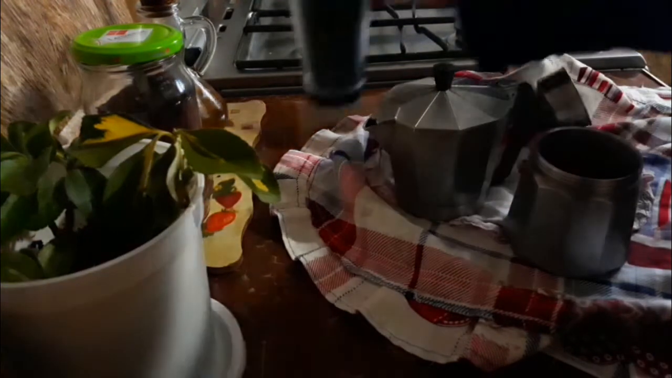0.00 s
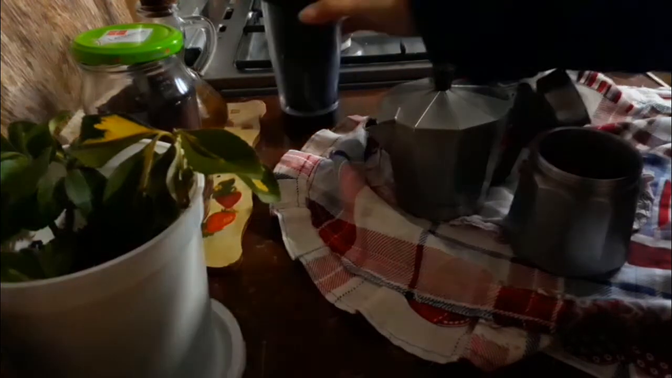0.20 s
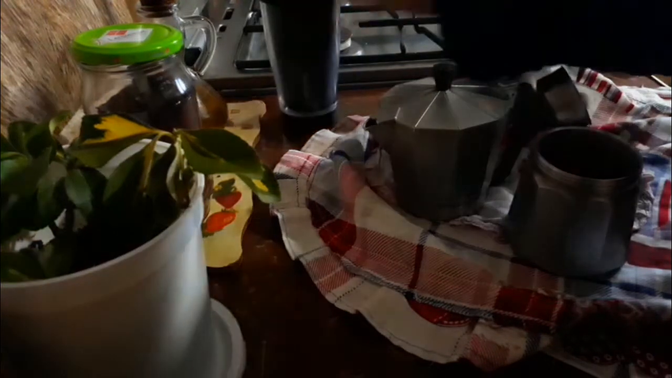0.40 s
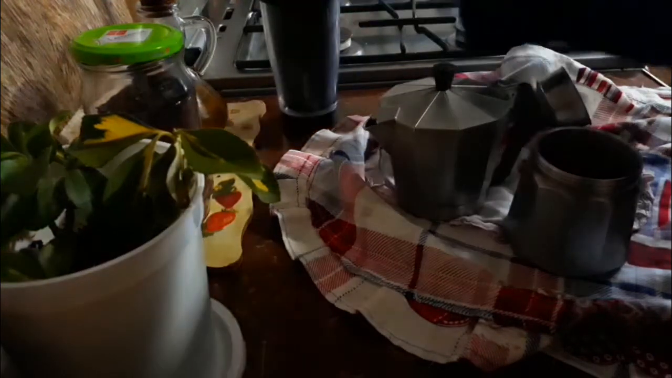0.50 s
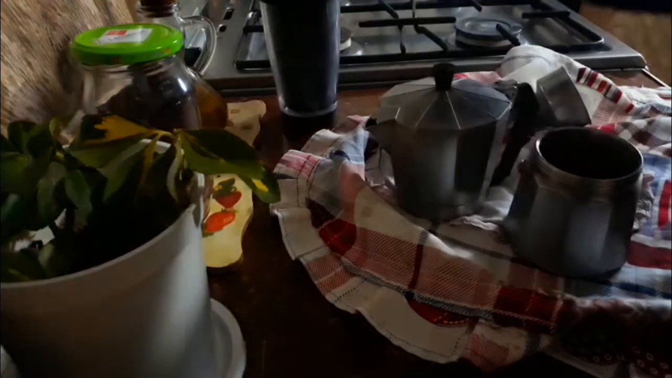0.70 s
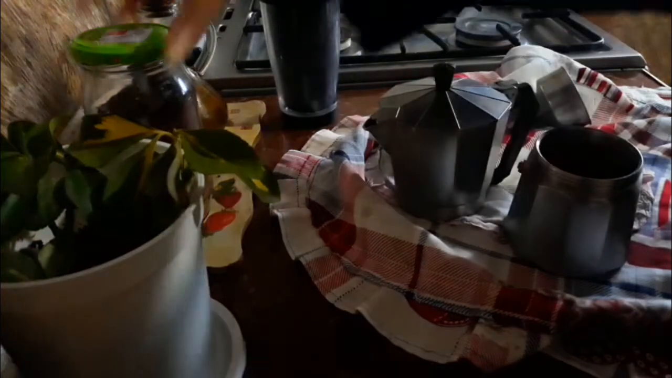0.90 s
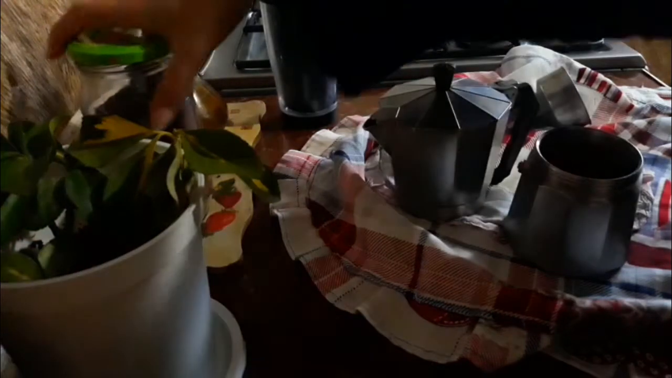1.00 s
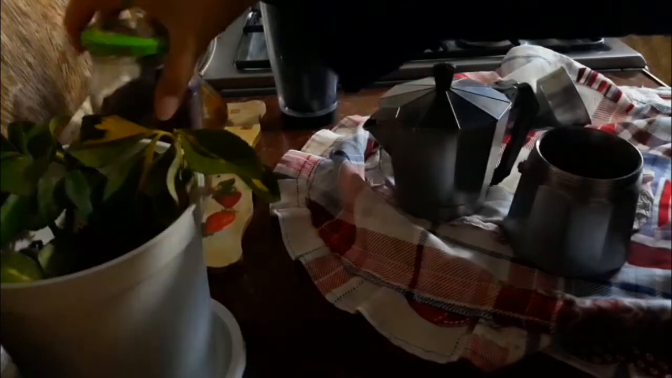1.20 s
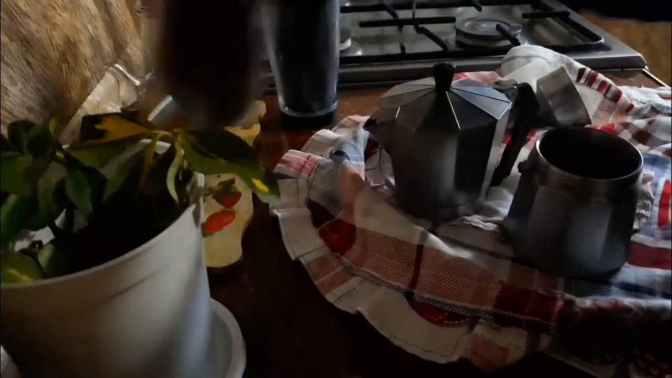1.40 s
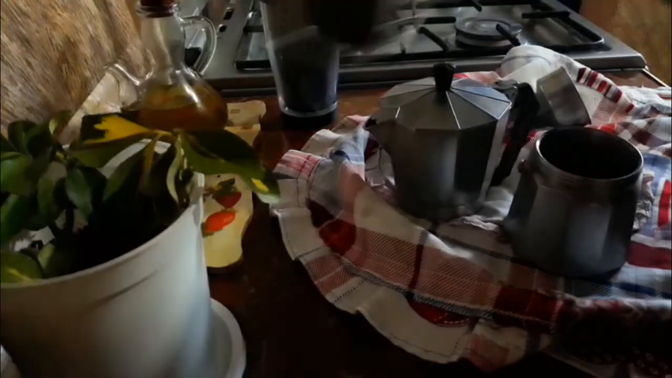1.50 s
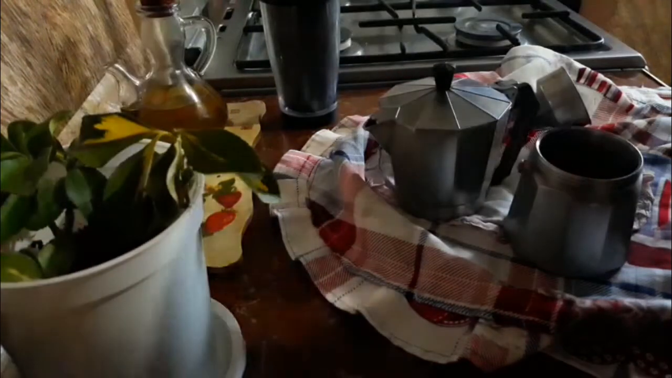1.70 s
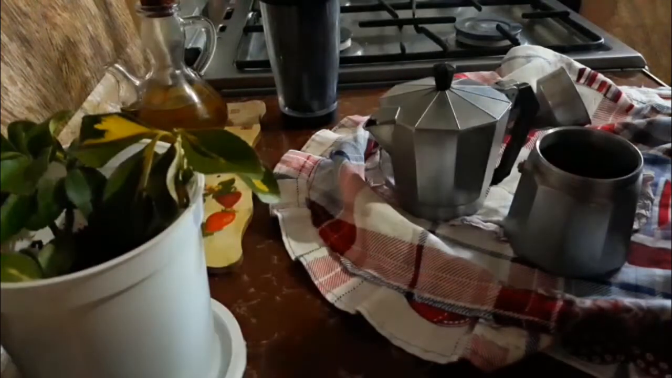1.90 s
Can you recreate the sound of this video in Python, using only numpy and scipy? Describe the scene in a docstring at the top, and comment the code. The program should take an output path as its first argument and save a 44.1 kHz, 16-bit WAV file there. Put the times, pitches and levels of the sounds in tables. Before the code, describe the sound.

In a small home kitchen over a low steady rumble, a cupboard slams loudly near the start; much softer latch ticks, a faint squeak, a jar bump and scrape follow, picked up by a fairly close microphone.

```python
"""A quiet kitchen over a low steady rumble (shaped noise). After a light latch tick a cupboard door bangs
shut: blows drive a crack, a rattle, panel modes and a room tail; two more ticks follow.
Then a faint squeak (narrow noise on a falling pitch), and a glass jar scuffs, bumps and scrapes as it is
lifted off the counter (clicks and slips through modes, coloured noise).
Near the end a soft high hiss (coloured noise) starts and soon loses its top."""
import sys
import numpy as np
from scipy import signal
from scipy.fft import rfft, irfft
from scipy.io import wavfile

SR = 44100
rng = np.random.default_rng(int(sys.argv[2]) if len(sys.argv) > 2 else 0)


def master_out(mix):
    """Clip the mix to full scale and print it as 16-bit PCM to the path in sys.argv[1]."""
    frames = np.transpose(np.atleast_2d(mix))
    ceiling = np.clip(frames, -1, 1)
    pcm = np.round(ceiling * 32767).astype(np.int16)
    wavfile.write(sys.argv[1], SR, pcm)


N = 88200
T = np.arange(N) / SR

# All levels are relative, before the mix gains, unless noted.
# door blows: first touch, full contact, rebounds (time [s], level [dB], contact decay constant [ms])
DOOR_BLOWS = [(.2234, -11, 0.02), (.2256, 8, 0.47), (0.242, -6, 1), (0.304, -12, 0.17)]
# door panel and cabinet modes, ahead of the high-pass (frequency [Hz], level [dB], t60 [s])
DOOR_MODES = [(113.3, -31.5, .5), (136.1, -27.5, 0.21), (245.8, -30, 0.35), (274.7, -24, 0.57),
              (322.8, -22.5, 0.085), (389.2, -17.5, 0.19), (469.7, -29, 0.1), (549.4, -24, .28),
              (603, -12.5, 0.1377), (664, -16, 0.11), (717.6, -26, .3), (788, -20.5, 0.2),
              (947.5, -29.5, 0.096), (1052, -21.5, 0.27), (1241, -34.5, 0.12)]
# spectrum of the contact crack (frequency [Hz], level [dB])
CRACK_SPECTRUM = [(30, -25), (55, -18.5), (110, -7.5), (180, -3), (380, 19.5), (700, 18.5), (1100, 20),
                  (1700, 6.5), (2600, 7), (3600, -0.5), (5500, -7.5), (8200, -3), (9500, -33.5),
                  (15000, -40.5)]
# spectrum of the knock sent to the room (frequency [Hz], level [dB])
KNOCK_ROOM_SPECTRUM = [(30, -7.5), (50, -9), (75, 4.5), (125, 16.5), (178, 8.5), (250, 19.5), (450, 16.5),
                       (750, 19), (1100, 14), (1600, 13), (2600, 6.5), (3600, -0.5), (5500, -9), (8200, -9),
                       (9600, -25), (15000, -33)]
CRACK_DB, PANEL_DB, PANEL_HIGH_PASS_HZ = 0.5, -2.5, 165
RATTLE_DB, RATTLE_MEAN_S = -1.5, 0.007655

# jar bumps (time [s], level [dB])
JAR_BUMPS = [(1.014, -9), (1.052, -19), (1.09, -12), (1.0975, 11), (1.104, -23)]
# modes of the jar on the counter (frequency [Hz], level [dB], t60 [s])
JAR_MODES = [(75, -62.5, .15), (115, -57, .2), (215, -59, .08), (385, -52.5, 0.076), (518.4, -56.5, 0.034),
             (610, -61, 0.047), (730, -52.5, .035), (1186.4, -59, 0.026), (1734, -55, 0.016),
             (1930, -59, 0.027), (2116, -63.5, 0.0091), (2527, -58, 0.04), (2711, -59, 0.016),
             (3500, -62.5, .015), (6280, -67.5, 0.011), (8600, -70.5, 0.012)]
# level of the jar's drag around the bumps (time [s], level [dB])
DRAG_LEVEL = [(.99, -37), (1.045, -18), (1.06, -6.5), (1.085, -6.5), (1.105, -1.5), (1.12, -17),
              (1.15, -8.5), (1.2, -48)]
# spectrum of dry grit under the jar (frequency [Hz], level [dB])
GRIT_SPECTRUM = [(100, -44), (700, -35), (2000, -43.5), (4500, -44.5), (8500, -44.5), (9500, -63.5),
                 (15000, -69)]
# scrape as the jar slides free (time [s], rms level [dB])
SCRAPE_LEVEL = [(1.085, -100), (1.1, -63.5), (1.13, -65.5), (1.18, -69.5), (1.21, -75), (1.26, -93.5)]
# spectrum of the scrape (frequency [Hz], level [dB])
SCRAPE_SPECTRUM = [(1000, -20.5), (1550, -6.5), (1870, 5.5), (2200, -18.5), (3200, -19), (3650, -1.5),
                   (4200, -8), (5500, -17.5), (8700, -25), (9800, -37)]
MEAN_SLIPS_PER_S, SLIPS_DB, JAR_ROOM_DB, JAR_DB = 2800, -5, -11, -5.5

# faint squeak (time [s], rms level [dB])
SQUEAK_LEVEL = [(0.751, -100), (.766, -75.5), (0.794, -71), (0.811, -76.5), (.84, -78), (.88, -87),
                (.92, -110)]
SQUEAK_HZ, SQUEAK_HALF_WIDTH_HZ = 2596.6, 170
SQUEAK_DROP_HZ, SQUEAK_SETTLE_S = 203, 0.028

# light latch ticks (time [s], level [dB])
LATCH_TICKS = [(.178, -55.5), (.368, -46), (.39, -41)]
# spectrum of the ticks (frequency [Hz], level [dB])
TICK_SPECTRUM = [(1000, -28.5), (4000, -9.5), (6000, -6), (7300, 7), (8700, 9), (10000, -12.5),
                 (15000, -13.5)]
TICK_DB, TICK_ROOM_DB = 6, -1.5
CHATTER_DECAY_S = 0.00797  # amplitude time constant of the contact bursts

# high hiss (time [s], level [dB])
HISS_LEVEL = [(1.715, -100), (1.732, -68.5), (1.765, -68.5), (1.795, -72), (1.808, -66), (1.84, -69.5),
              (1.88, -71), (1.92, -71), (2, -76.5)]
# spectrum of the hiss (frequency [Hz], level [dB])
HISS_SPECTRUM = [(1000, -23.5), (2800, -5), (3600, -10.5), (4400, -0.5), (5200, 0), (6500, -3), (8600, 1.5),
                 (9700, -11), (13500, -3.5), (15500, -4)]
HISS_GRAIN_DB, HISS_TOP_HZ = 4.6, 9100
HISS_DULLS_S, HISS_DULL_TIME_S = 1.86, 0.035

# room reverberation times; a separate fade makes the late tail sink ever faster
# (frequency [Hz], t60 before that fade [s])
ROOM_T60 = [(60, 0.44), (130, 0.61), (260, 0.6), (700, 0.77), (1500, 0.68), (3000, 0.51), (6000, 0.75),
            (14000, 0.4)]
ROOM_DELAY_S, ROOM_BUILD_S = .005, 0.0018
TAIL_FADE_S = 0.56  # the fade takes a further 9 dB by this time

# background spectrum (frequency [Hz], relative density [dB/Hz])
BACKGROUND_SPECTRUM = [(15, -66.5), (25, -31), (43, -26), (53, -8.5), (107, -1.5), (148, -2.5),
                       (174, -10.5), (234, -13), (290, -22.5), (568, -24), (616, -26.5), (1060, -29),
                       (2570, -34.5), (5920, -34.5), (6410, -32.5), (9610, -41), (15600, -38)]
BACKGROUND_RMS_DB = -66
BAND_EDGE_HZ = 15780


def amp(db):
    """Decibels to gain."""
    return 10 ** (np.asarray(db) / 20)


def evened(x):
    """Scales to rms 1."""
    return x / np.sqrt(np.mean(x ** 2) + 1e-20)


def read(points, hz):
    """Reads a spectrum on a log-frequency axis."""
    f, value = np.transpose(points)
    return np.interp(np.log(hz + 1), np.log(f), value)


def curve(points):
    """Gain over time from a level curve."""
    return amp(np.interp(T, *np.transpose(points)))


def through(x, response):
    """Convolves and cuts to the scene's length."""
    return signal.fftconvolve(x, response)[:N]


def low_pass(x, hz, order):
    """Butterworth low-pass."""
    return signal.sosfilt(signal.butter(order, hz, fs=SR, output="sos"), x)


def high_pass(x, hz, order):
    """Butterworth high-pass."""
    return signal.sosfilt(signal.butter(order, hz, "high", fs=SR, output="sos"), x)


def colour(x, points, size=4096):
    """Minimum-phase (causal) filter with the given spectrum."""
    hz = abs(np.fft.fftfreq(size, 1 / SR))
    log_gain = np.log(amp(read(points, hz)))
    response = np.fft.ifft(np.exp(np.conj(signal.hilbert(log_gain)))).real
    return through(x, response[:size // 2])


def clicks(rows):
    """One impulse for each (time [s], level [dB])."""
    return sum(amp(db) * (np.arange(N) == round(s * SR)) for s, db in rows)


def chatter(rows):
    """Each (time [s], level [dB]) becomes a decaying noise burst of tiny contacts."""
    spread = np.exp(-2 * T / CHATTER_DECAY_S)
    power = abs(through(clicks(rows) ** 2, spread / spread.sum()))
    return np.sqrt(power) * rng.standard_normal(N)


def ring(modes):
    """Impulse response of a struck object: exponentially dying sines."""
    response = np.zeros(N)
    for hz, db, t60 in modes:
        decay = np.exp(-np.log(1000) * T / t60)
        response += amp(db) * decay * np.sin(2 * np.pi * hz * T)
    return response


def room(x):
    """Random-sign reflections, each band dying at its own speed, under a common fade that quickens."""
    taps = rng.choice([-1., 1.], N) * (rng.random(N) < .2)
    hz, t, bands = signal.stft(taps, SR, nperseg=256)
    t60 = read(ROOM_T60, hz)[:, None]
    bands = bands * np.exp(-np.log(1000) * t / t60 - (t / TAIL_FADE_S) ** 2)
    onset = np.clip((T - ROOM_DELAY_S) / ROOM_BUILD_S, 0, 1)
    tail = signal.istft(bands, SR)[1][:N] * onset
    return through(x, tail / np.linalg.norm(tail))


def door_force():
    """Blows as decaying pushes of set impulse; longer contacts are duller."""
    force = np.zeros(N)
    for s, db, contact_ms in DOOR_BLOWS:
        push = np.exp(-T * 1000 / contact_ms)
        force += through(clicks([(s, db)]), push / push.sum())
    return force


def hinge_rattle(force):
    """Hinges and shelves: each blow excites a short swelling and dying noise burst."""
    burst = rng.standard_normal(N) * T * np.exp(-2 * T / RATTLE_MEAN_S)
    return high_pass(through(force, burst / np.linalg.norm(burst)), 900, 2)


def door():
    """Each blow cracks, rattles, rings the panel and fills the room."""
    force = door_force()
    crack = colour(force + amp(RATTLE_DB) * hinge_rattle(force), CRACK_SPECTRUM)
    panel = high_pass(through(force, ring(DOOR_MODES)), PANEL_HIGH_PASS_HZ, 4)
    echo = room(colour(force, KNOCK_ROOM_SPECTRUM))
    return amp(CRACK_DB) * crack + amp(PANEL_DB) * panel + echo


def jar():
    """Bumps and random slips excite the jar's modes and grit; it scrapes as it comes free."""
    slip_gate = rng.random(N) < MEAN_SLIPS_PER_S / SR
    slips = rng.standard_normal(N) * slip_gate * curve(DRAG_LEVEL)
    force = chatter(JAR_BUMPS) + amp(SLIPS_DB) * slips
    body = through(force, ring(JAR_MODES)) + colour(force, GRIT_SPECTRUM)
    body = high_pass(body, 90, 2)
    scrape = evened(colour(rng.standard_normal(N), SCRAPE_SPECTRUM)) * curve(SCRAPE_LEVEL)
    return amp(JAR_DB) * (body + amp(JAR_ROOM_DB) * room(body)) + scrape


def squeak():
    """Narrow noise around a carrier whose pitch settles from a little above."""
    noise = rng.standard_normal(N) + 1j * rng.standard_normal(N)
    waver = low_pass(noise, SQUEAK_HALF_WIDTH_HZ, 3)
    since_start = np.maximum(T - SQUEAK_LEVEL[0][0], 0)
    hz = SQUEAK_HZ + SQUEAK_DROP_HZ * np.exp(-since_start / SQUEAK_SETTLE_S)
    carrier = np.exp(2j * np.pi * np.cumsum(hz) / SR)
    return evened((waver * carrier).real) * curve(SQUEAK_LEVEL)


def latch_ticks():
    """Light bursts of tiny contacts, coloured, with their echo in the room."""
    ticks = colour(chatter(LATCH_TICKS), TICK_SPECTRUM)
    return amp(TICK_DB) * ticks + amp(TICK_ROOM_DB) * room(ticks)


def hiss():
    """Coloured noise crossfades at equal power to a grainier, low-passed one."""
    smooth = evened(colour(rng.standard_normal(N), HISS_SPECTRUM))
    grains = rng.standard_normal(N) * amp(HISS_GRAIN_DB * rng.standard_normal(N))
    dull = low_pass(evened(colour(grains, HISS_SPECTRUM)), HISS_TOP_HZ, 8)
    turn = np.pi / 4 * (1 + np.tanh((T - HISS_DULLS_S) / HISS_DULL_TIME_S))
    return curve(HISS_LEVEL) * (np.cos(turn) * smooth + np.sin(turn) * dull)


def background():
    """Steady noise shaped into a low rumble with a faint even hiss."""
    gain = amp(read(BACKGROUND_SPECTRUM, np.fft.rfftfreq(N, 1 / SR)))
    spectrum = rfft(rng.standard_normal(N)) * gain
    return amp(BACKGROUND_RMS_DB) * evened(irfft(spectrum, N))


def scene():
    """All sources at one microphone."""
    return (door() + jar() + squeak() + latch_ticks() + hiss() + background())[None]


def record(dry):
    """Rounds off peaks smoothly below 0.98, then limits the band with a linear-phase low-pass."""
    held = dry / (1 + (dry / .98) ** 8) ** (1 / 8)
    low_pass_taps = signal.firwin(1023, BAND_EDGE_HZ, window=("kaiser", 9), fs=SR)
    return signal.oaconvolve(held, low_pass_taps[None], "same")


dry = scene()
out = record(dry)
master_out(out)
```